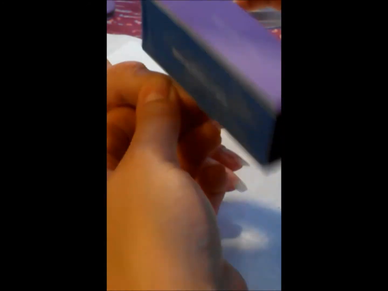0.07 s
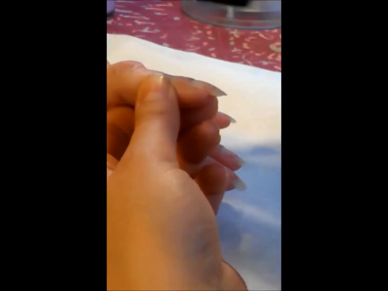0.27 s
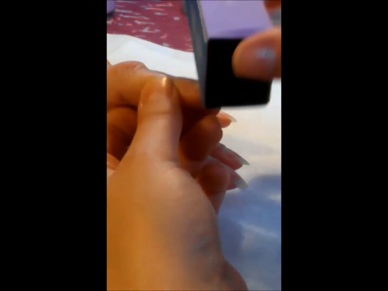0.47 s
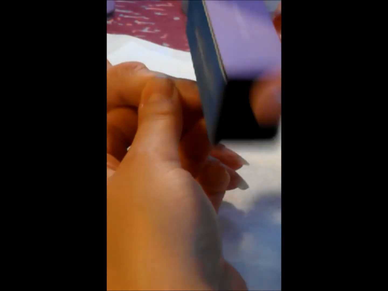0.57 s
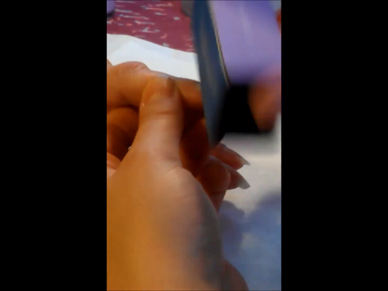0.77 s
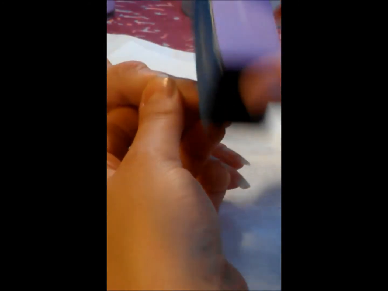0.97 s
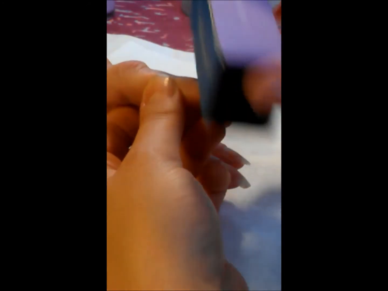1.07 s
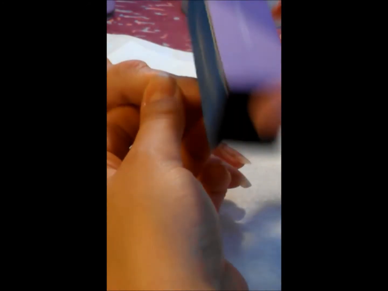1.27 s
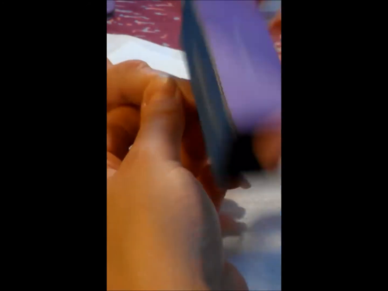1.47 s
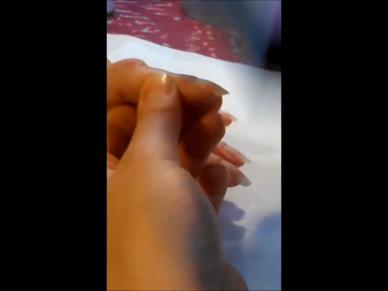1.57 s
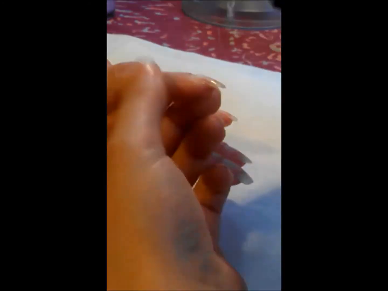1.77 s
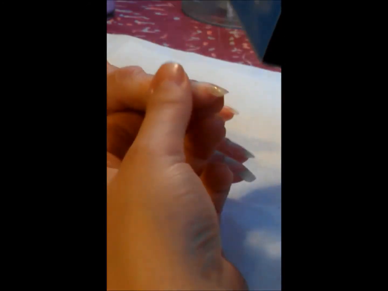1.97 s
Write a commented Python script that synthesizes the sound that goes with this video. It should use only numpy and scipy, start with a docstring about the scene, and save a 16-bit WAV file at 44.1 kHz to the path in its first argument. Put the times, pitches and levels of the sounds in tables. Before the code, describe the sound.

A gritty foam buffer block rubs a fingernail, close to a phone microphone. Several light, dry scratching strokes run from 0 to about 0.35 seconds, then a pause. At 0.57 the block lands with a tiny tick and soft thud, and quick uneven back-and-forth rasps follow, stronger, with crisp catches, until 1.7. Then only quiet room murmur and hiss remain until 2 seconds.

```python
"""Foam block rubbed over a thumbnail

A soft foam buffer block is rubbed quickly to and fro over a thumbnail, close to a phone microphone.
Its grit catches in dense tiny slips that ring damped modes of nail and block; the finest grit hisses.
Harder catches stand out singly, the block lands with a tick and a soft thud, and firm strokes sound hollow.
The room answers with decaying noise tails, over a quiet room tone of low murmur and hiss."""
import sys
import numpy as np
from scipy import signal
from scipy.fft import rfft, irfft, next_fast_len
from scipy.io import wavfile
from scipy.ndimage import uniform_filter1d, map_coordinates

SR = 44100
rng = np.random.default_rng(int(sys.argv[2]) if len(sys.argv) > 2 else 0)


def waveform_to_disk(signal):
    """Save audio, clipped to [-1, 1], as 16-bit WAV at the path in sys.argv[1]."""
    frames = np.transpose(np.atleast_2d(signal))
    scaled = np.clip(frames, -1, 1) * 32767
    samples = np.round(scaled).astype(np.int16)
    wavfile.write(sys.argv[1], SR, samples)


def voltage_ratio(level):
    """Linear amplitude factor for a level in decibels (scalar or array-like)."""
    return 10 ** (np.asarray(level, float) / 20)


N = 89126

# damped modes of the thumbnail: (centre [Hz], width [Hz], relative level [dB])
NAIL_MODES = [(2938, 253, 1), (3320, 261, 3), (3585, 262, -0.5), (4160, 950, -15.5), (4950, 210, -16)]
# damped modes of the foam block: (centre [Hz], width [Hz], relative level [dB])
BLOCK_MODES = [(760, 210, -26), (1880, 362, -9.5), (2395, 490, 1), (2603, 442, 2)]


def unit(x):
    """Scales a signal to rms 1."""
    return x / np.sqrt(np.mean(x ** 2) + 1e-20)


def along(points, hz):
    """Interpolates (frequency [Hz], value) points on a log frequency axis."""
    f, v = np.transpose(points)
    return np.interp(np.log(hz + 1), np.log(f + 1), v)


def wobble(rate):
    """A smooth random curve with rate knots a second."""
    knots = rng.standard_normal(N // 20)
    return map_coordinates(knots, [np.arange(N) * rate / SR])


def filtered(x, response):
    """Filters x by a complex response of frequency, padded so that tails do not wrap round."""
    m = next_fast_len(N + SR // 2)
    spectrum = rfft(x, m) * response(np.fft.rfftfreq(m, 1 / SR))
    return irfft(spectrum, m)[..., :N]


def modes(table):
    """Causal response of damped resonances in alternating polarity, rms gain 1 on white noise."""
    def response(f):
        h = 0
        for k, (centre, width, db) in enumerate(table):
            resonance = 1j * f * width / (centre * centre - f * f + 1j * f * width)
            h = h + (-1) ** k * voltage_ratio(db) * resonance
        return h / np.sqrt(np.mean(abs(h) ** 2))
    return response


def grit():
    """Random tiny slips of uneven size and either sign, swelling and thinning in clumps; rms 1."""
    slips_per_s, slip_spread_db = 12000, 0.8
    clump_db, clumps_per_s = 0.5, 280
    happens = rng.random(N) < slips_per_s / SR
    size = rng.standard_normal(N) * voltage_ratio(slip_spread_db * rng.exponential(size=N))
    return unit(happens * size * voltage_ratio(clump_db * wobble(clumps_per_s)))


def rubbing():
    """Slips under the moving stroke ring nail and block; the finest grit only hisses."""
    # stretches of rubbing, each a list of (time [s], rubbing strength [dB],
    # block ring before its trim, over the nail [dB], dust hiss before its trim, over the nail [dB])
    stretches = [
        [(0.0, -35, -2, 1), (0.028, -36.5, -6, -1), (0.056, -53, -2, 10), (0.106, -38, -1, 6.5),
         (0.148, -37, -8, 1.5), (0.184, -60, -4, 0), (0.208, -44, -1.5, 6), (0.242, -36.5, -6, 3.5),
         (0.276, -40.5, -1.5, 10.5), (0.36, -61, -25, 3)],
        [(0.574, -49, -6, 0), (0.596, -65, -9, 11), (0.606, -48.5, 1, 0), (0.628, -37, -10.5, 2.5),
         (0.686, -35, -4, -4), (0.738, -56.5, 0.5, 11), (0.76, -37.5, -4, 1), (0.806, -32.5, -13, -2.5),
         (0.836, -60, -16, 7), (0.84, -54, -11, 0)],
        [(0.84, -53, -19, 3), (0.846, -36, -12.5, 1), (0.908, -33.5, 0.5, -2), (0.94, -53, -0.5, 11),
         (0.984, -41.5, -1, 5), (1.012, -31.5, -10.5, -4), (1.058, -54, -14, 11), (1.074, -38.5, -3.5, 5),
         (1.134, -36, -3.5, -1.5), (1.166, -57, -14, 5), (1.174, -49, 1.5, 10), (1.226, -35.5, -8.5, 1),
         (1.27, -53.5, -12, 5)],
        [(1.27, -56, -9.5, -2), (1.278, -46, -12, 8), (1.294, -35.5, -7.5, 4), (1.32, -40.5, -4.5, 3),
         (1.362, -40.5, 0, -6), (1.37, -52, -15, -5), (1.406, -44, -1, 9), (1.462, -32, -16, -1),
         (1.47, -36, -11, -9), (1.48, -35, -7, -7), (1.504, -55.5, -27, 12), (1.524, -33.5, -6, -2),
         (1.536, -40, -5, 5.5), (1.608, -30.5, -4, -3), (1.642, -38.5, -12, -1), (1.652, -53.5, -18, -6),
         (1.7, -59, -12, 0)],
    ]
    # spectrum of the fine dust hiss: (frequency [Hz], relative density [dB])
    dust_spectrum = [(300, -50), (800, -8), (1500, -14.5), (4500, 0), (6000, -7.5), (8000, -19.5),
                     (11000, -10.5), (14000, -11), (16000, -4.5)]
    block_trim_db, dust_trim_db = 1, -15
    t, out = np.arange(N) / SR, np.zeros(N)
    for rows in stretches:
        s, *cols = np.transpose(rows)
        strength_db, dull_db, dust_db = (np.interp(t, s, c) for c in cols)
        force = voltage_ratio(strength_db) * (t >= s[0]) * (t < s[-1])
        nail = filtered(force * grit(), modes(NAIL_MODES))
        block = filtered(force * voltage_ratio(dull_db + block_trim_db) * grit(), modes(BLOCK_MODES))
        hiss = unit(filtered(rng.standard_normal(N), lambda hz: voltage_ratio(along(dust_spectrum, hz))))
        out += nail + block + force * voltage_ratio(dust_db + dust_trim_db) * hiss
    return out


def catches():
    """Single hard slips ring the same modes; the landing adds a thin tick and a soft low thud."""
    # grains that catch hard: (time [s], blow level before the trim [dB])
    hard_slips = [(0.0174, -25), (0.0274, -23), (0.0745, -25), (0.1284, -24), (0.5736, -25), (0.609, -36),
                  (0.6594, -17), (0.7493, -24), (0.8054, -13.5), (0.843, -24), (0.9054, -12.5),
                  (0.9567, -32), (1.0001, -20), (1.0086, -16), (1.07, -29), (1.0938, -12.5), (1.1064, -27),
                  (1.173, -32), (1.2208, -21), (1.2759, -18.5), (1.2909, -37), (1.3034, -22), (1.3843, -28),
                  (1.4311, -20), (1.4586, -32), (1.4784, -14), (1.5124, -23), (1.5229, -11.5)]
    trim_db, block_db = 1, -9
    tick_s, tick_width_s, tick_db = 0.5738, 0.00005, -35
    thud_s, thud_db, thud_hz = 0.577, -45, 426
    thud_t60, thud_attack_s = 0.024, 0.00099
    blows = np.zeros(N)
    for s, db in hard_slips:
        blows[round(s * SR)] = voltage_ratio(db + trim_db)
    nail = filtered(blows, modes(NAIL_MODES))
    block = voltage_ratio(block_db) * filtered(blows, modes(BLOCK_MODES))
    t = np.arange(N) / SR
    tick = voltage_ratio(tick_db) * np.exp(-((t - tick_s) / tick_width_s) ** 2)
    since = np.maximum(t - thud_s, 0)
    thud = voltage_ratio(thud_db - 60 * since / thud_t60) * np.sin(2 * np.pi * thud_hz * since)
    thud *= 1 - np.exp(-since / thud_attack_s)
    return nail + block + thud + tick


def hollow():
    """Grit under a firmly pressed stroke drives the block's low mode."""
    # firm presses: (middle [s], half length [s], level [dB])
    presses = [(0.284, 0.017, -54.5), (0.668, 0.033, -54), (.9, .03, -62), (1.58, 0.037, -62)]
    # the hollow mode of the block: (centre [Hz], width [Hz], relative level [dB])
    hollow_mode = [(777, 105, 0)]
    t = np.arange(N) / SR
    press = sum(voltage_ratio(db) * np.exp(-((t - s) / half) ** 2) for s, half, db in presses)
    return filtered(press * grit(), modes(hollow_mode))


def room(x):
    """The room's answer: decaying noise of unit energy, a new tail for each eighth of a second."""
    # reverberation time: (frequency [Hz], t60 [s])
    decay = [(500, 0.9), (3000, 0.14), (10000, 0.45)]
    out = np.zeros(N)
    for start in range(0, N, SR // 8):
        hz, t, z = signal.stft(rng.standard_normal(SR // 2), SR, nperseg=256)
        fade = voltage_ratio(-60 * t / along(decay, hz)[:, None])
        tail = signal.istft(z * fade, SR, nperseg=256)[1]
        tail = tail / np.linalg.norm(tail)
        wet = signal.fftconvolve(x[start:start + SR // 8], tail)[:N - start]
        out[start:start + len(wet)] += wet
    return out


def room_tone():
    """Shaped noise, a low murmur and a hiss, with faint patches in time and frequency."""
    # spectrum of the room tone: (frequency [Hz], relative density [dB])
    air_spectrum = [(40, -22), (90, -18), (140, -15.5), (220, -3.5), (300, 0), (450, -1.5), (800, -8),
                    (1300, -8.5), (2200, -9.5), (3500, -13), (5500, -15.5), (7800, -20), (10000, -17.5),
                    (14000, -15), (15900, -20)]
    # course of the room tone: (time [s], level before the trim [dB])
    air_course = [(0.0, -56.5), (0.5, -58), (0.68, -56.5), (2.02, -56.5)]
    trim_db, patch_db = 5.5, 1.0
    z = signal.stft(rng.standard_normal(N), nperseg=512)[2]
    patches = uniform_filter1d(rng.standard_normal(z.shape), 8, 0)  # over frequency
    patches = unit(uniform_filter1d(patches, 20, 1))  # over time
    noise = signal.istft(z * voltage_ratio(patch_db * patches), nperseg=512)[1][:N]
    level_db = np.interp(np.arange(N) / SR, *np.transpose(air_course))
    tone = unit(filtered(noise, lambda hz: voltage_ratio(along(air_spectrum, hz))))
    return voltage_ratio(level_db + trim_db) * tone


def scene():
    """Rubbing, catches and hollow strokes, their echo and the room tone, mono."""
    echo_db = -8.5
    near = rubbing() + catches() + hollow()
    return (near + voltage_ratio(echo_db) * room(near) + room_tone())[None]


def top_cut(x):
    """Nothing passes above the cut-off."""
    return signal.sosfilt(signal.butter(12, 15990, fs=SR, output="sos"), x)


def record(dry):
    """The phone microphone rolls off the bass in two first-order stages and cuts the top sharply."""
    low_cut_hz, top_hz = 150, 15740
    mic = filtered(dry, lambda hz: (hz < top_hz) * (1j * hz / (low_cut_hz + 1j * hz)) ** 2)
    return top_cut(mic)


dry = scene()
out = record(dry)
waveform_to_disk(out)
```